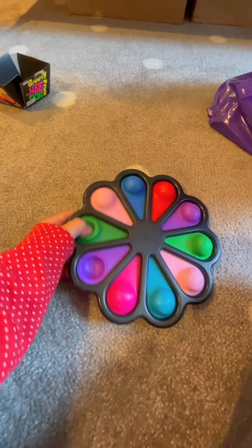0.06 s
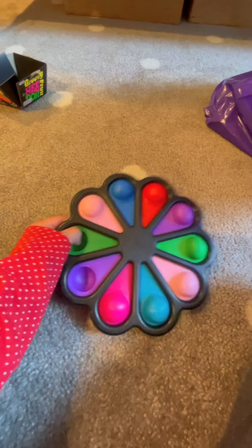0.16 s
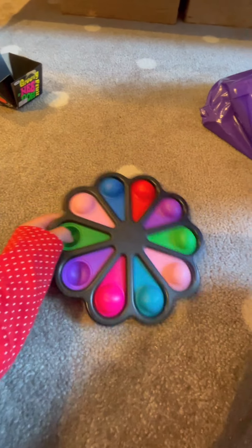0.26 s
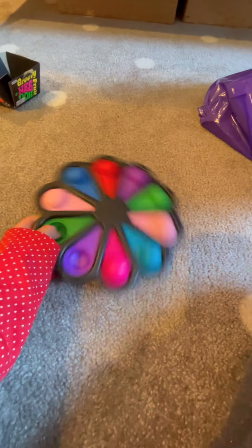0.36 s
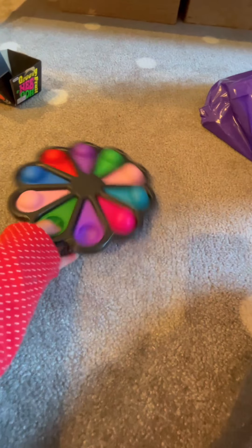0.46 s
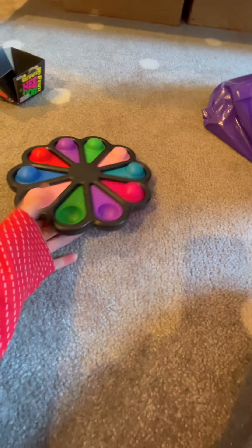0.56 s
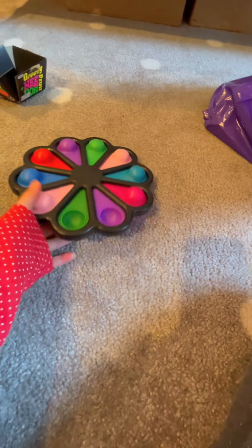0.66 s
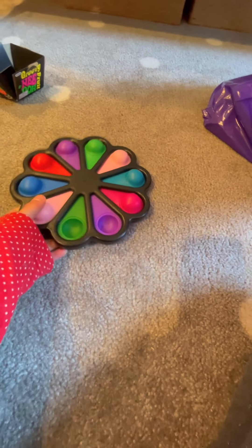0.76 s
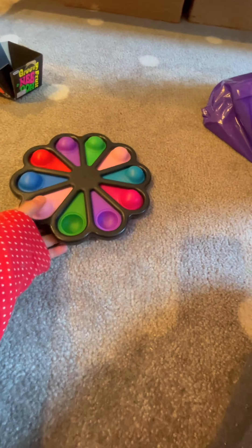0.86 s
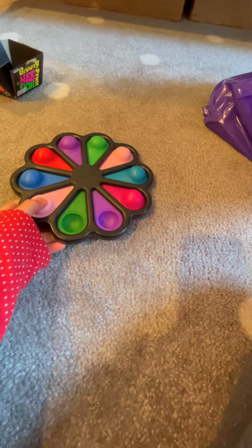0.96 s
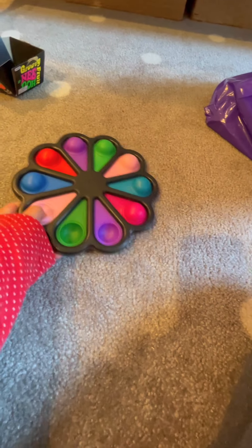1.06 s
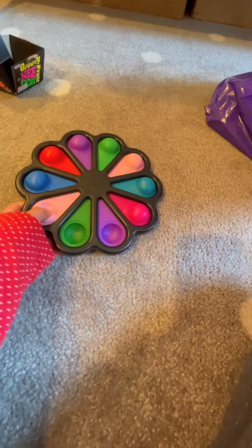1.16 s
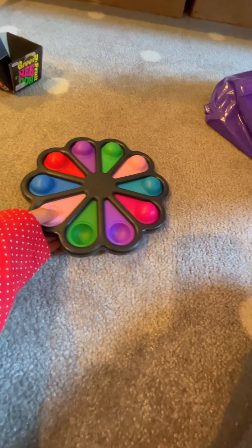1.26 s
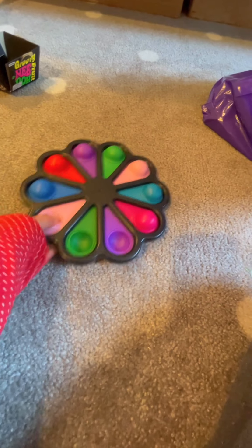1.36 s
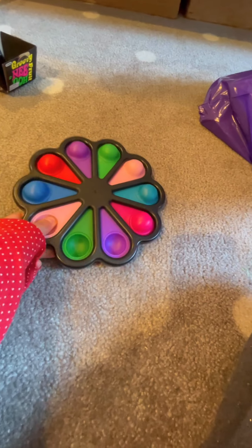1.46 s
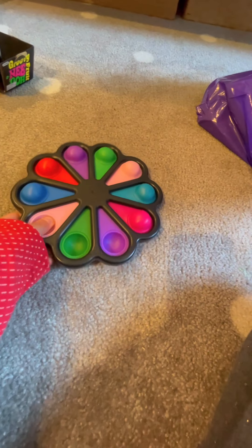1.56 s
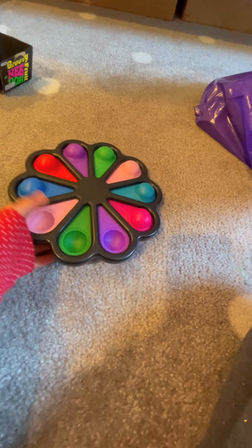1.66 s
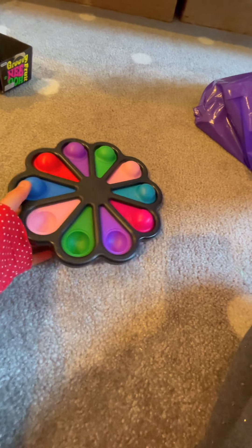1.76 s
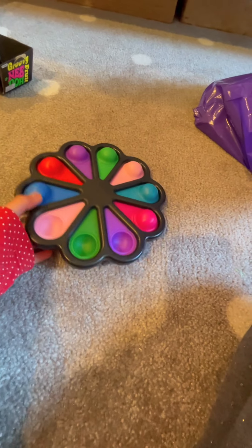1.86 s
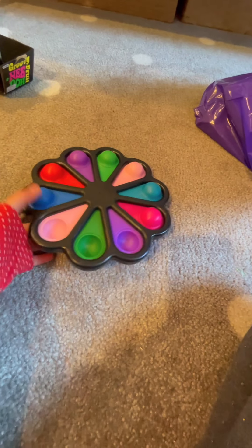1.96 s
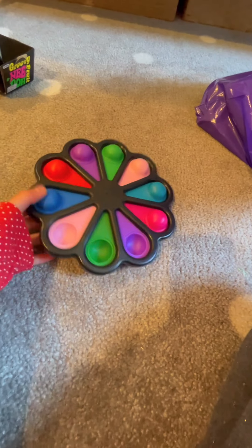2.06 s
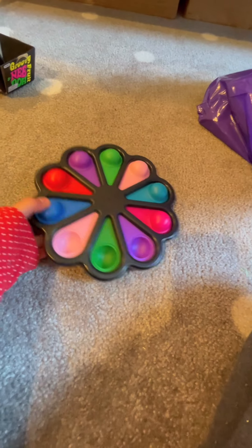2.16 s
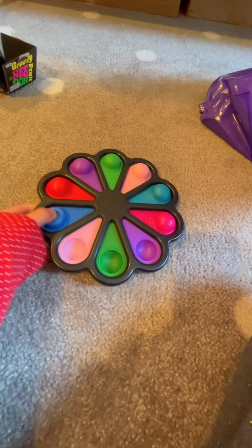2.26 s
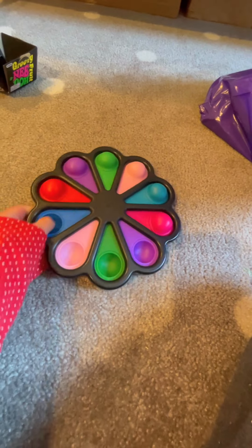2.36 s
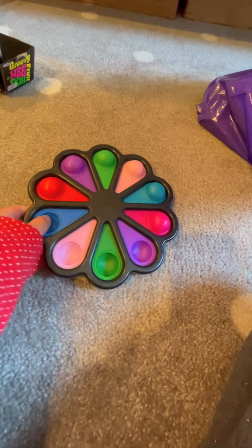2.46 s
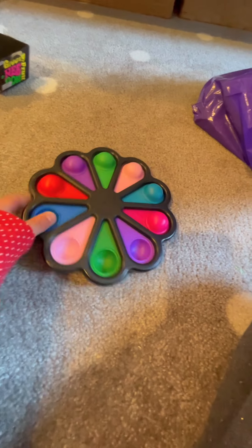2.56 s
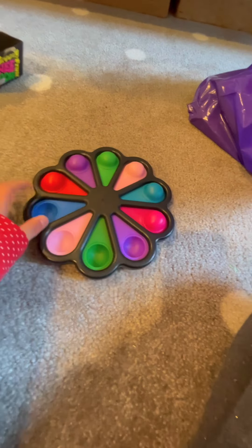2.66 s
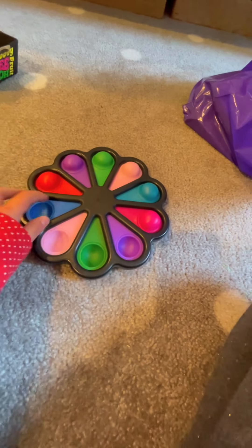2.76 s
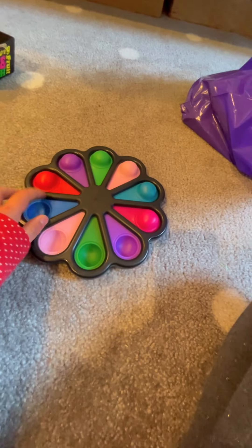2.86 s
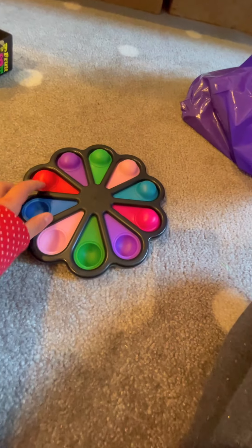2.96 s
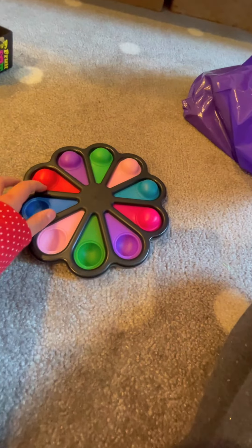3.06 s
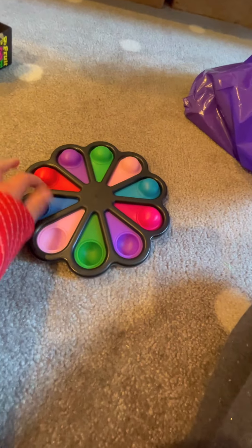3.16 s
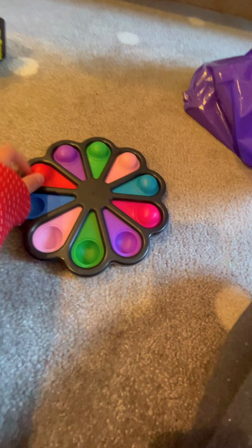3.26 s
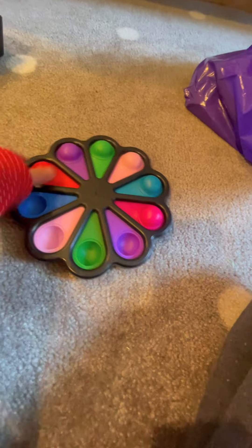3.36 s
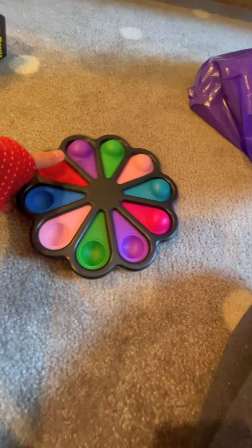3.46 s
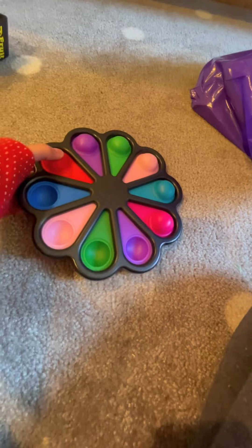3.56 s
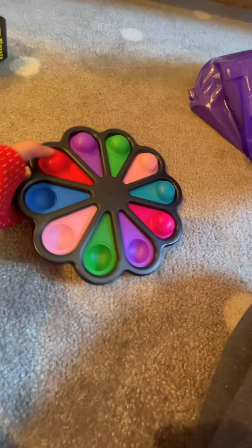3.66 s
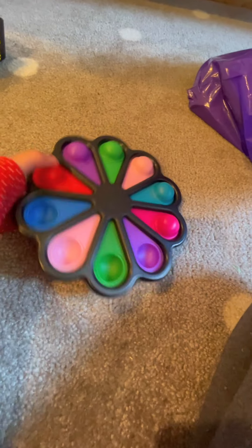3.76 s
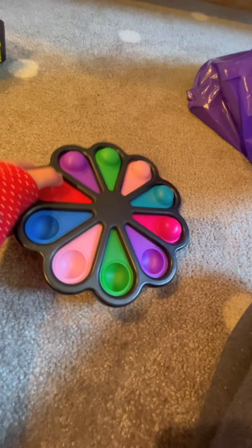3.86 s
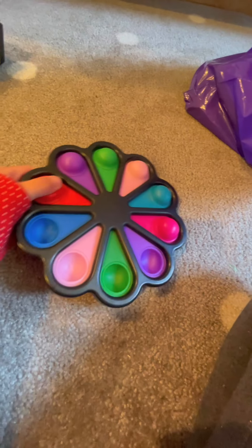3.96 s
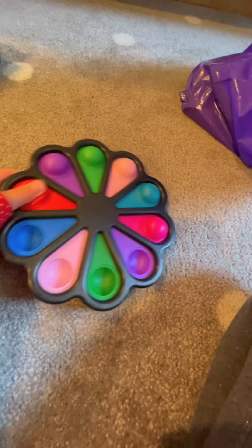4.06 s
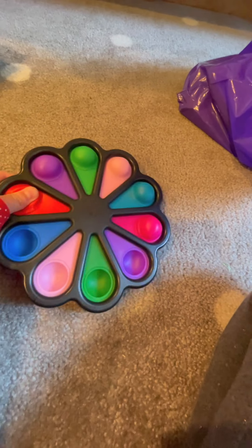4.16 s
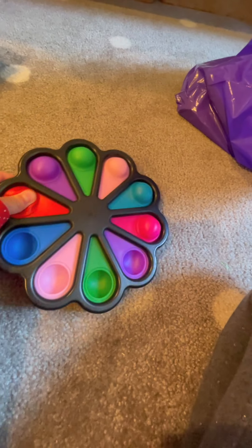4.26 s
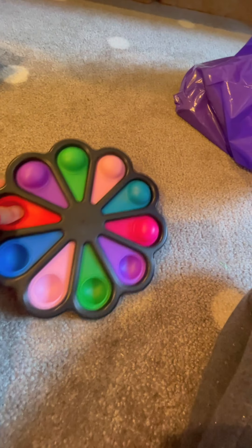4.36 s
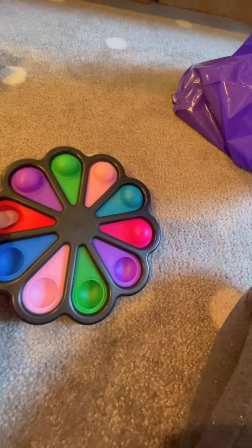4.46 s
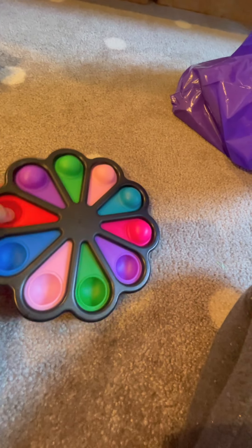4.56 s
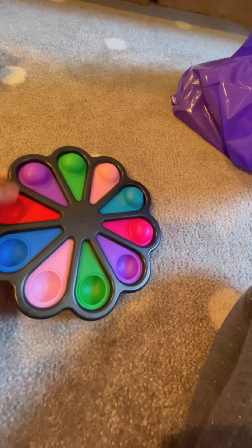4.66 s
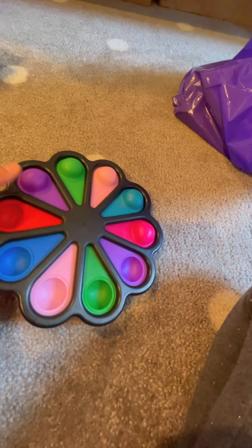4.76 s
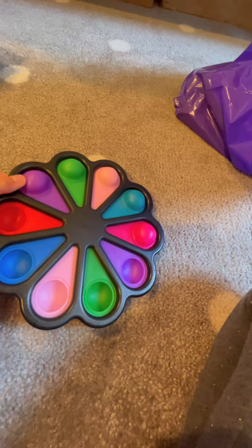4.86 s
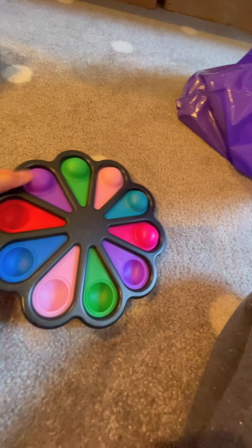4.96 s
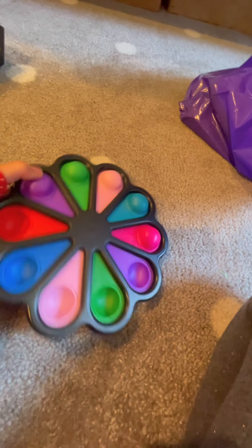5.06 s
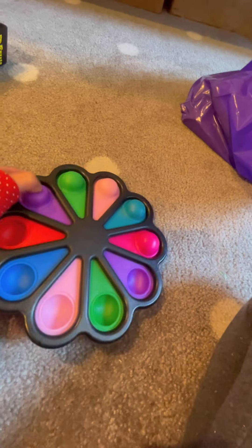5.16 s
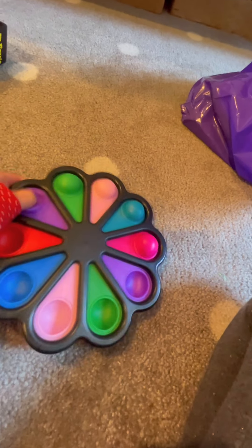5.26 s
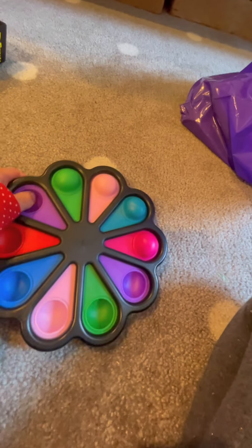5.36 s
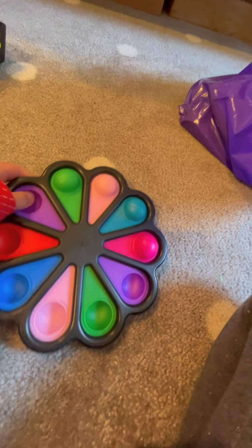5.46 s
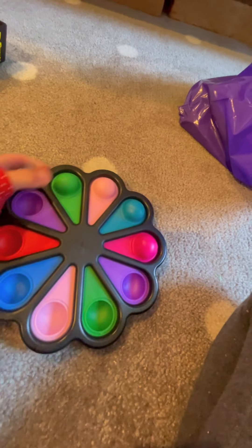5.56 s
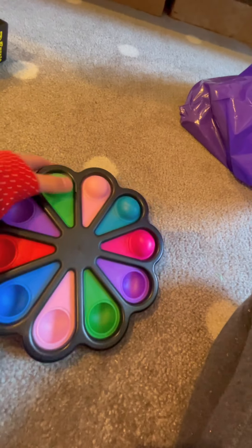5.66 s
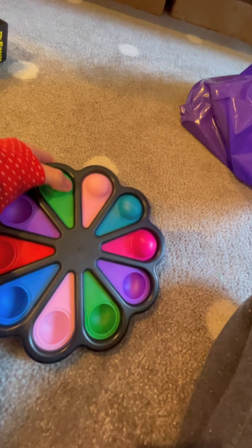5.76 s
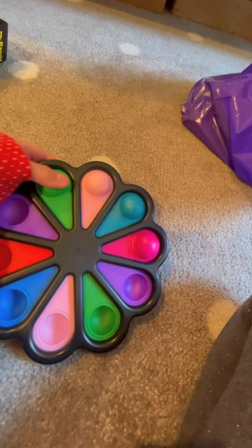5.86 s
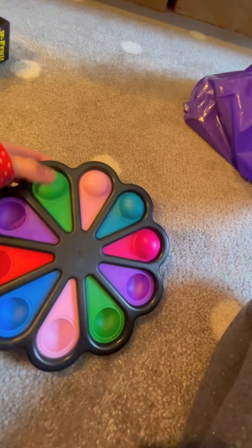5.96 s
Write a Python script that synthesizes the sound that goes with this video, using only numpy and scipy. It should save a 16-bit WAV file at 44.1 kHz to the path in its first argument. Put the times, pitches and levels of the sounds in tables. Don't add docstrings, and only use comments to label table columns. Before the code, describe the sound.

A finger presses rubbery bubbles through in a quiet small room. Each gives a brief skin crackle, then a snappy pop falling in pitch with a hollow plastic knock. An opening double pop, a soft thump and a medium pop come first; three stronger pops follow, some led by a smaller click. Light fabric rustle, finger ticks and grip rumble fill the gaps over distant airflow, recorded close on a handheld phone.

```python
import sys
import numpy as np
from scipy import signal
from scipy.fft import rfft, irfft, next_fast_len
from scipy.io import wavfile
from scipy.ndimage import map_coordinates

SR = 44100
rng = np.random.default_rng(int(sys.argv[2]) if len(sys.argv) > 2 else 0)


def waveform_to_disk(signal):
    frames = np.transpose(np.atleast_2d(signal))
    scaled = np.clip(frames, -1, 1) * 32767
    samples = np.round(scaled).astype(np.int16)
    wavfile.write(sys.argv[1], SR, samples)


def makeup_ratio(level_db):
    decades = np.asarray(level_db, float) / 20
    return 10 ** decades


N = 264600
LEAD_IN = 256

# (time [s], dome level [dB], settled pitch [Hz], frame ring level [dB], body thud level [dB])
FLIPS = [(0.105, -18.3, 370, -30.5, -34), (0.1247, -16.9, 570, -22.4, -18.7),
         (1.3978, -17, 630, -26, -18.3), (2.3375, -30, 447, -57.5, -42), (2.349, -33, 599.5, -42, -60.5),
         (2.3564, -13.2, 500, -10.2, -12.7), (4.079, -26, 1000, -43.5, -29.5),
         (4.3306, -25.5, 700, -41.5, -60.5), (4.3383, -11.1, 700, -12.8, -14.5),
         (5.2464, -19.4, 790, -31.4, -20), (5.283, -36.5, 694, -43, -59), (5.291, -10.6, 680, -12.5, -12)]


def unit(x):
    return x / np.sqrt(np.mean(x ** 2) + 1e-20)


def along(points, hz):
    f, v = np.transpose(points)
    return np.interp(np.log(hz + 1), np.log(f + 1), v)


def wobble(rate):
    knots = rng.standard_normal(int(N * rate / SR) + 4)
    return map_coordinates(knots, [np.arange(N) * rate / SR])


def filtered(x, response):
    m = next_fast_len(x.shape[-1] + 4096)
    hz = np.fft.rfftfreq(m, 1 / SR)
    return irfft(rfft(x, m) * response(hz), m)[..., :x.shape[-1]]


def diffuse(pair, spectrum):
    # (frequency [Hz], left-right correlation [-1 to 1])
    coherence = [(60, 1), (125, 0.83), (190, 1), (400, 0.7), (700, -0.091), (3000, .1), (7000, -0.35),
                 (11000, -0.44), (15000, -.5)]

    def mid_side(hz):
        turn = np.arccos(np.clip(along(coherence, hz), -1, 1)) / 2
        return makeup_ratio(along(spectrum, hz)) * [np.cos(turn), np.sin(turn)]

    mid, side = filtered(pair, mid_side)
    return np.array([mid + side, mid - side])


def direct(x):
    # (frequency [Hz], lead of the left port [rad])
    port_lead = [(1500, .1), (2500, 0.77), (4500, 1.2), (7000, 1.9), (9000, 2.79), (11500, 2.85),
                 (13500, 2.85), (16000, 2.55)]
    return filtered(x, lambda hz: np.exp(.5j * np.outer([1, -1], along(port_lead, hz))))


def swells(rows, rest_db):
    edge_db = 8.5
    t = np.arange(0, N + 64, 64) / SR
    power = makeup_ratio(2 * rest_db)
    for s, length, db in rows:
        power = power + makeup_ratio(2 * (db - edge_db * (2 * (t - s) / length) ** 2))
    return np.interp(np.arange(N) / SR, t, np.sqrt(power))


def onset_time(length):
    return np.maximum(np.arange(-LEAD_IN, length) / SR, 0)


def add(out, s, sound):
    i = round(s * SR) - LEAD_IN
    out[i:i + len(sound)] += sound[:len(out) - i]


def room(x):
    # (frequency [Hz], t60 [s])
    wall_decay = [(150, 0.21), (700, 0.26), (2000, 0.22), (5000, 0.235), (12000, 0.05)]
    # (frequency [Hz], level re direct sound [dB])
    echo_level = [(100, -26), (400, -15.5), (900, -15), (2500, -17), (6000, -13), (15000, -28)]
    out, step = np.zeros((2, N + SR)), SR // 2
    for i in range(0, N, step):
        hz, t, z = signal.stft(rng.standard_normal((2, SR // 3)), SR, nperseg=128)
        decay = makeup_ratio(-60 * t / along(wall_decay, hz)[:, None])
        tail = signal.istft(z * decay, SR, nperseg=128)[1]
        seconds = np.arange(tail.shape[1]) / SR
        tail = tail * np.clip(seconds / 0.0028 - .7, 0, 1)
        wet = signal.fftconvolve(x[None, i:i + step], tail / np.linalg.norm(tail[0]), axes=1)
        out[:, i:i + wet.shape[1]] += wet
    return diffuse(out[:, :N], echo_level)


def ventilation():
    # (frequency [Hz], level [dB per Hz])
    room_tone = [(12, -38.5), (20, -9.5), (59, -1.5), (111, -7.5), (163, -14.5), (245, -14), (300, -12),
                 (359, -15.5), (647, -23.5), (857, -24), (1020, -28.5), (2510, -46.5), (3590, -49.5),
                 (5830, -49.5), (9000, -62.5), (11700, -92.5), (19800, -120)]
    # (frequency [Hz], level [dB], frequency wander [Hz])
    hum_tones = [(60, -62, 11), (117.6, -65.5, 6.5)]
    rush_db = -56.4
    rush = unit(diffuse(rng.standard_normal((2, N)), room_tone))
    out = makeup_ratio(rush_db + .7 * wobble(3)) * rush
    for hz, db, wander_hz in hum_tones:
        phase = np.cumsum(hz + wander_hz / 3 * wobble(9.7)) / SR
        level = makeup_ratio(db + 5.5 + 2.0 * wobble(11))
        port_shift = np.outer([1, -1], 0.044 * wobble(6))
        out = out + level * np.sin(2 * np.pi * phase + port_shift)
    return out


def grip():
    # (middle [s], length [s], rumble level [dB])
    squeezes = [
        (1.39, .16, -53),
        (1.6, .25, -58.5),
        (2.68, .2, -54),
        (3.98, .2, -57),
        (4.28, .3, -58.5),
        (5.55, .2, -60),
    ]
    # (frequency [Hz], level [dB per Hz])
    case_colour = [(15, -29), (45, -2), (75, 1), (120, -7), (250, -21.5), (500, -44.5), (1000, -120)]
    hold_db = -81
    noise = filtered(rng.standard_normal((2, N)), lambda hz: makeup_ratio(along(case_colour, hz)))
    rumble = unit(makeup_ratio(4.5 * wobble(9.2)) * noise)
    opposed = np.outer([1, -1], rumble[0])
    return makeup_ratio(2.5) * swells(squeezes, hold_db) * (opposed + 0.73 * rumble[1])


def hand():
    # (middle [s], length [s], sleeve level [dB], finger rub level re sleeve [dB])
    moves = [(.01, .1, -86.5, 5), (0.097, 0.079, -72.5, 8), (.26, 0.17, -79, 1), (0.464, 0.21, -78.5, 1.5),
             (0.774, 0.21, -83.5, 1.5), (.99, 0.13, -84, 4.5), (1.158, .025, -83, 10),
             (1.225, .04, -75.5, 11.5), (1.35, 0.22, -82, 2), (1.518, 0.085, -88, 11.5),
             (1.607, 0.086, -82.5, 9), (1.743, .05, -80.5, 5), (1.86, .1, -79, 2), (1.957, .03, -84, 10),
             (2.037, .03, -83.5, 10.5), (2.196, 0.11, -80, 2), (2.557, 0.11, -77, 1.5),
             (2.653, .08, -80.5, 2.5), (2.93, .24, -79.5, -6.5), (3.036, 0.036, -80.5, 8.5),
             (3.37, .44, -83, -1), (3.69, .11, -80, 4), (4.09, .24, -82.5, -2), (4.529, .26, -80.5, 5),
             (4.821, .05, -75.5, 1.5), (5.07, .14, -80.5, 3), (5.18, .04, -84, 11),
             (5.52, 0.22, -82.5, 2.5), (5.72, .13, -77, -9), (5.885, .05, -74.5, 2)]
    # (frequency [Hz], level [dB per Hz])
    cloth_colour = [(2500, -39), (3500, -5), (6000, 0.5), (8000, -7), (11000, -10.5), (15500, -12),
                    (16200, -51.5), (17000, -120)]
    # (frequency [Hz], level [dB per Hz])
    rub_colour = [(600, -27.5), (1200, -6), (2000, -7), (2500, 0), (3000, -13), (4000, -39.5), (5000, -120)]
    still_db = -102
    hiss = swells([(s, length, db + 2.5) for s, length, db, _ in moves], still_db)
    rub = swells([(s, length, db + over_db + 2.5) for s, length, db, over_db in moves], still_db)
    out = 0
    for gain, colour in ((hiss, cloth_colour), (rub, rub_colour)):
        graininess = makeup_ratio(2.1 * wobble(120) + 0.89 * wobble(32))
        grain = rng.standard_normal((3, N)) * graininess
        near = direct(filtered(grain[0], lambda hz: makeup_ratio(along(colour, hz))))
        out = out + gain * unit(near + 1.1 * diffuse(grain[1:], colour))
    return out


def burst(rise, t60, tilt_db):
    # (frequency [Hz], level [dB])
    port_colour = [(300, -15.5), (1000, -2.5), (2500, -3), (3700, -9), (6000, -4.5), (8000, -10),
                   (11000, -9.5), (15000, -10), (16000, -13.5), (16800, -58.5)]
    t = onset_time(1792)
    colour = lambda hz: makeup_ratio(along(port_colour, hz) + tilt_db * np.log2(hz / 4000 + 0.078))
    spikes = rng.standard_normal(len(t)) * makeup_ratio(rng.normal(0, 3.3, len(t)))
    grit = unit(filtered(spikes, colour))
    shape = (1 - np.exp(-t / max(rise, 1e-4))) * makeup_ratio(-60 * t / t60)
    return unit(grit * shape) * np.sqrt(np.mean(shape ** 2))


def ticks():
    # (time [s], peak level [dB], knock [dB])
    finger_ticks = [(1.1518, -70, 5), (1.2202, -62, 18.5), (1.544, -62.5, -3), (1.5738, -68, 7),
                    (1.5844, -53, 5), (1.6297, -67, 5), (1.8322, -62, 13), (1.8853, -66, 10),
                    (2.0338, -68, 8), (2.137, -71, 14), (2.5347, -51.5, 3.5), (2.6367, -71, 15),
                    (3.031, -70, 12.5), (3.5179, -71, 7), (3.8784, -75.5, 9.5), (4.1346, -61, -2.5),
                    (4.5427, -67, 9), (4.6088, -76.5, 10.5), (4.6337, -66.5, 11.5), (4.809, -65.5, 2.5),
                    (4.8294, -73, -1), (4.9805, -66, 17), (5.0475, -75, 20), (5.177, -70, 13),
                    (5.4139, -55.5, 20.5), (5.465, -65, 11), (5.654, -71, 14), (5.694, -68, 8),
                    (5.807, -70, 30), (5.8586, -68, 13)]
    out = np.zeros(N)
    for s, db, knock_db in finger_ticks:
        t60 = .012 + .0006 * knock_db
        add(out, s, makeup_ratio(db + 5.5 + knock_db / 2) * burst(0.0005, t60, -knock_db / 2.0))
    return out


def squeaks():
    # (time [s], level [dB], resonance [Hz], t60 [s])
    slips = [
        (3.675, -64, 4000, .1),
        (4.078, -25.5, 6000, 0.0089),
        (4.101, -63.5, 5800, .15),
        (4.54, -63, 6000, .07),
        (5.286, -42, 2700, .03),
        (2.12, -76, 6000, 0.13),
    ]
    out, t = np.zeros(N), onset_time(3840)
    for s, db, hz, t60 in slips:
        width_hz, rise = 0.15 * hz, .08 * t60
        noise = rng.standard_normal(len(t))
        slip = filtered(noise, lambda f: np.exp(-((f - hz) / width_hz) ** 2))
        add(out, s, makeup_ratio(db) * (unit(slip) * (1 - np.exp(-t / rise)) * makeup_ratio(-60 * t / t60)))
    return out


def peels():
    # (time [s], level [dB], t60 [s], brightness [dB per octave])
    skin_peels = [(0.057, -48, 0.012, -15), (.068, -53.5, 0.013, -4), (.105, -28.5, 0.011, 1.5),
                  (0.1234, -24, 0.018, -1), (1.024, -54, .015, 1), (1.0317, -35.5, 0.023, -2.5),
                  (1.3865, -50, .012, 2), (1.39, -48, .012, -8), (1.395, -27, 0.022, 1),
                  (1.397, -22, 0.012, -4), (2.329, -56, .01, -1), (2.3362, -30, 0.014, -2),
                  (2.349, -44, 0.012, -3), (2.356, -19.5, 0.035, -6.5), (4.0708, -50, .015, 0),
                  (4.079, -27.5, .009, 3.5), (4.33, -27, 0.013, 1), (4.3385, -13, 0.012, 1),
                  (5.239, -53, .015, -3), (5.247, -21, 0.0066, -1.5), (5.271, -49.5, .01, -5),
                  (5.284, -36, 0.014, -2), (5.2918, -8, .012, -4.5)]
    out = np.zeros(N)
    for s, db, t60, tilt_db in skin_peels:
        rise = .0005 * makeup_ratio(-.9 * tilt_db)
        add(out, s, makeup_ratio(db) * burst(rise, t60, tilt_db))
    return out


def flip_length(dome_db):
    return .0059 + .0001 * dome_db


def thuds():
    # (time [s], level [dB], pitch [Hz], t60 [s])
    nudges = [
        (1.0311, -30, 1094, 0.0065),
        (1.0352, -24, 343, 0.026),
        (1.0428, -32.5, 343, 0.032),
        (4.951, -61, 1046, 0.029),
        (4.999, -59, 1050, 0.028),
        (5.4148, -44, 1105, 0.02),
        (5.654, -55, 1095, 0.037),
        (5.695, -66.5, 2004, .03),
        (5.809, -60, 1090, .03),
    ]
    lag, thud_hz, thud_t60 = .688, 400, .0106
    out, t = np.zeros(N), onset_time(SR // 12)
    blows = list(nudges)
    for s, dome_db, _, _, thud_db in FLIPS:
        blows.append((s + lag * flip_length(dome_db), thud_db, thud_hz, thud_t60))
    for s, db, hz, t60 in blows:
        turns = hz * (t + .4 * .003 * (1 - np.exp(-t / 0.0054)))
        add(out, s, makeup_ratio(db - 60 * t / t60) * (1 - np.exp(-t / 0.00017)) * np.sin(2 * np.pi * turns))
    return out


def domes():
    # (frequency [Hz], level [dB], t60 [s])
    frame_modes = [(1000, -2.5, 0.011), (1673, -4.8, 0.0091), (2370, .4, .006), (2960, -14, 0.0051)]
    out, t = np.zeros(N), onset_time(SR // 12)
    ring = sum(makeup_ratio(db - 60 * t / t60) * np.sin(2 * np.pi * f * t) for f, db, t60 in frame_modes)
    ring = (1 - np.exp(-t / .0003)) * ring
    for s, dome_db, hz, frame_db, _ in FLIPS:
        first_hz = 3226 + 59.6 * dome_db
        length = flip_length(dome_db)
        fall = .225 * length
        turns = hz * t + (first_hz - hz) * fall * (1 - np.exp(-t / fall))
        u = t / length
        shape = u ** 1.046 * np.exp(-3 * u ** 2.24)
        add(out, s, makeup_ratio(dome_db + 10.5) * shape * np.sin(2 * np.pi * turns))
        add(out, s + .355 * length, makeup_ratio(frame_db + 7.5) * ring)
    return out


def toy():
    out = ticks() + squeaks() + peels() + thuds() + domes()
    return filtered(out, lambda hz: (1j * hz / (110 + 1j * hz)) ** 2)


def scene():
    # (time [s], left-right level difference [dB])
    position = [
        (0, -1),
        (1.4, 1),
        (2.4, 1),
        (4.3, 1.4),
        (5.3, 1.37),
        (6, -0.5),
    ]
    near = toy()
    seconds, balance_db = np.transpose(position)
    pan_db = np.interp(np.arange(N) / SR, seconds, balance_db)
    panned = direct(near) * makeup_ratio([pan_db / 2, -pan_db / 2])
    return panned + room(near) + hand() + grip() + ventilation()


def band_limit(x):
    return signal.sosfilt(signal.butter(12, 16700, fs=SR, output="sos"), x)


def record(dry):
    soft = dry / (1 + np.abs(dry / .65) ** 4) ** (1 / 4)
    mix = filtered(soft, lambda hz: 1j * hz / (35 + 1j * hz))
    return band_limit(mix)


dry = scene()
out = record(dry)
waveform_to_disk(out)
```